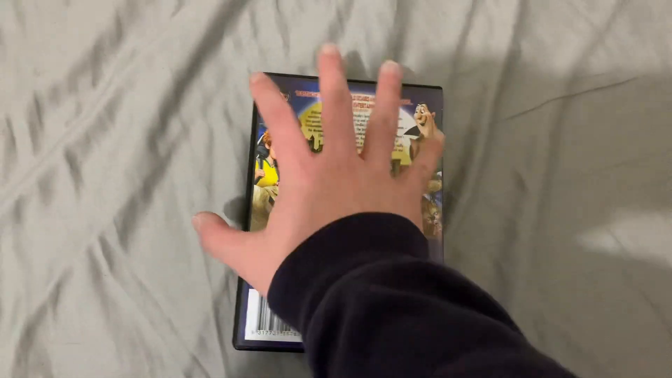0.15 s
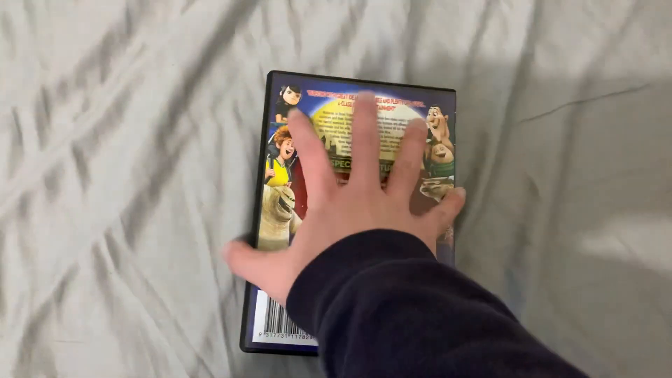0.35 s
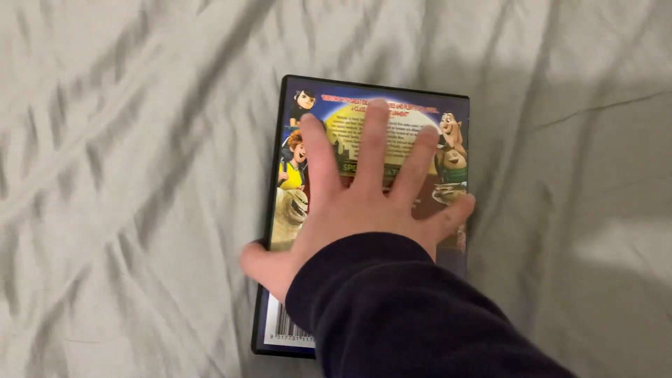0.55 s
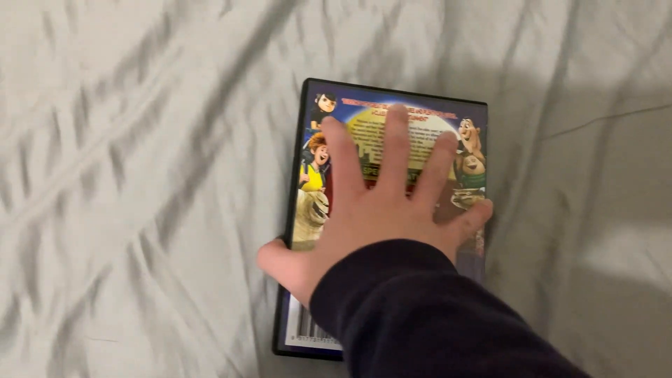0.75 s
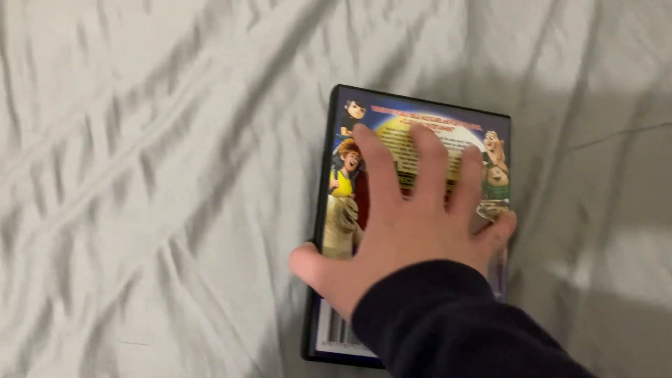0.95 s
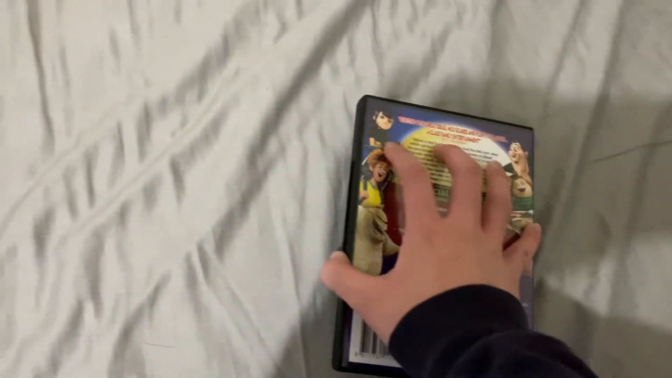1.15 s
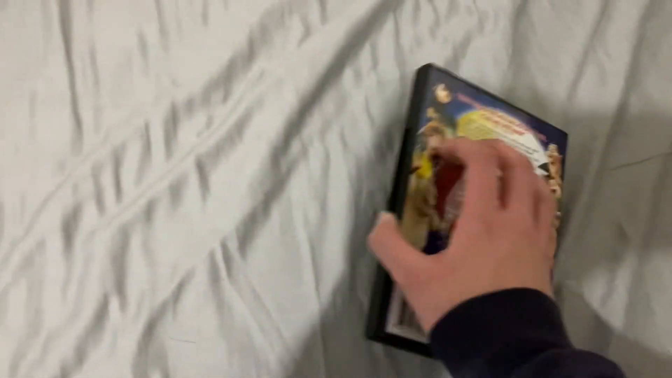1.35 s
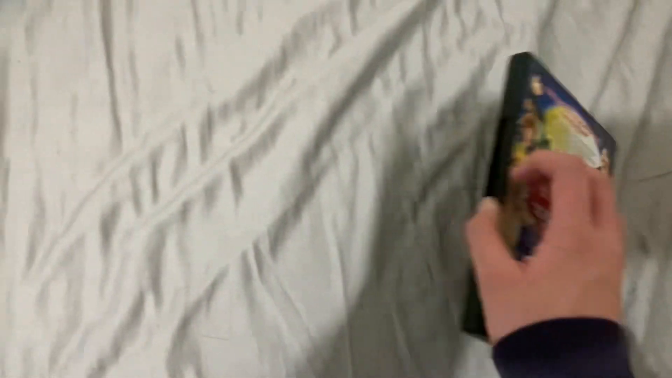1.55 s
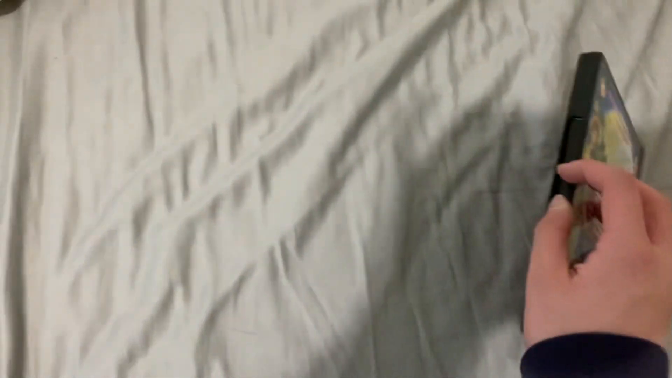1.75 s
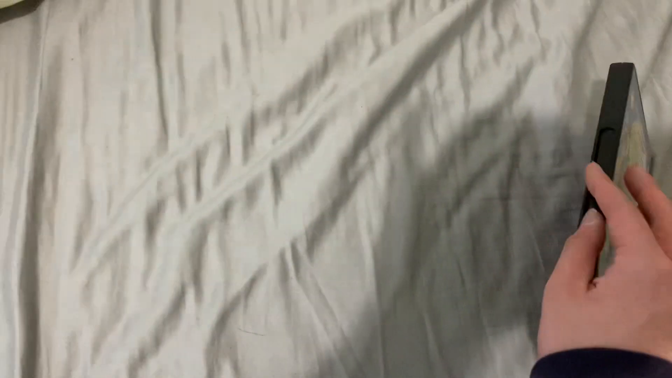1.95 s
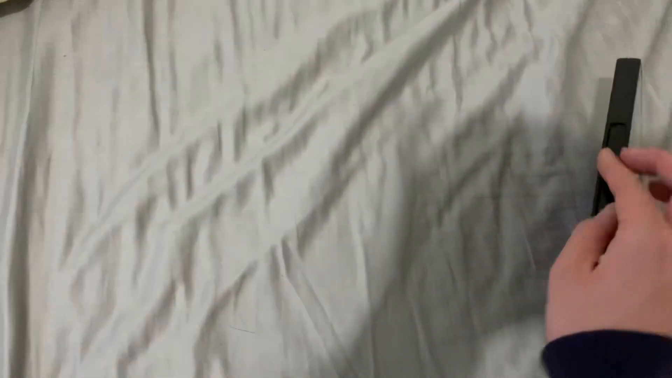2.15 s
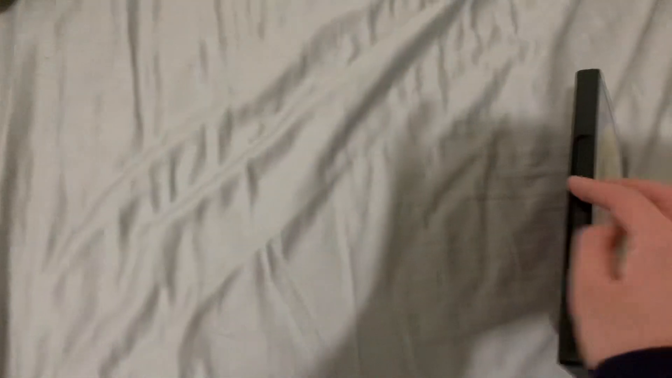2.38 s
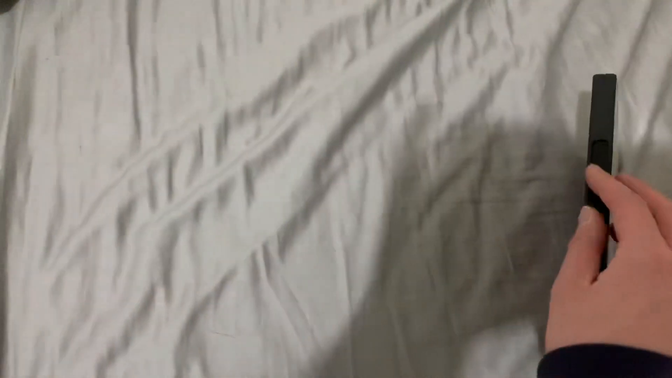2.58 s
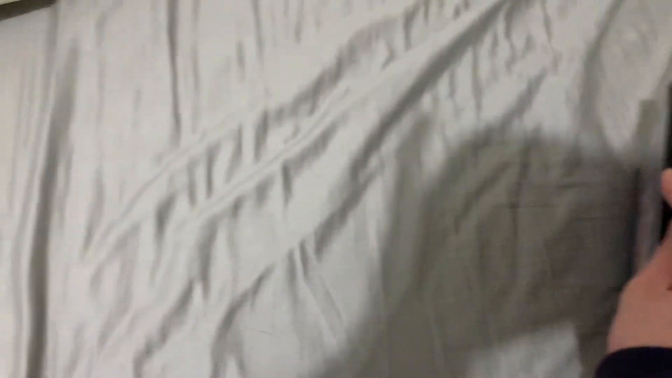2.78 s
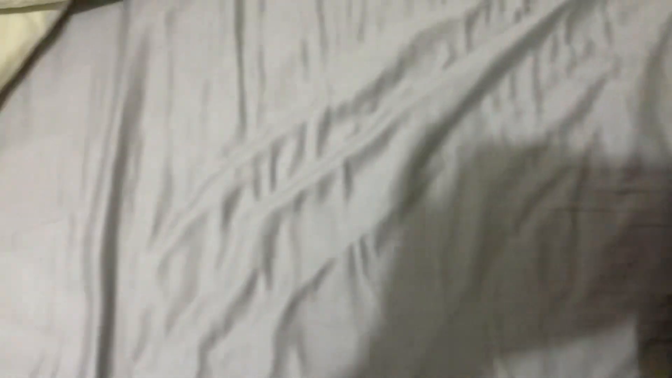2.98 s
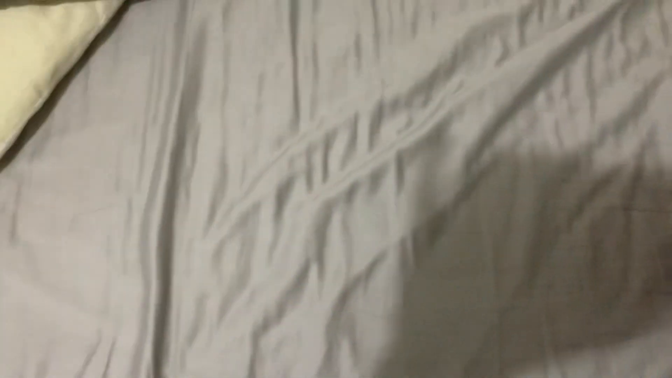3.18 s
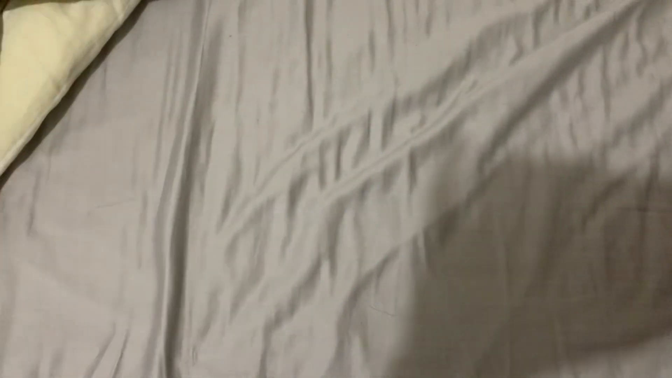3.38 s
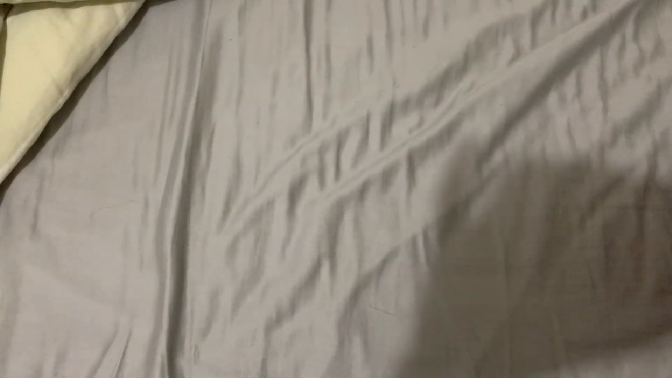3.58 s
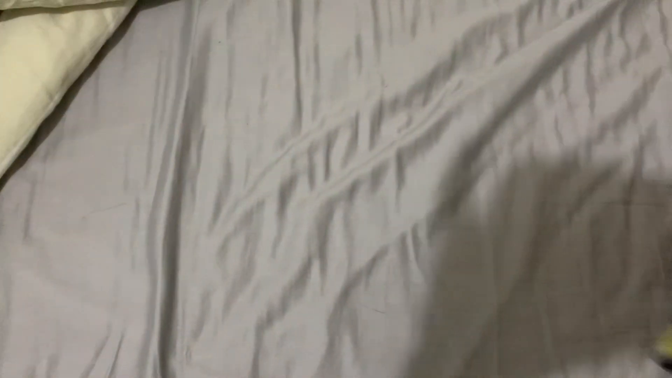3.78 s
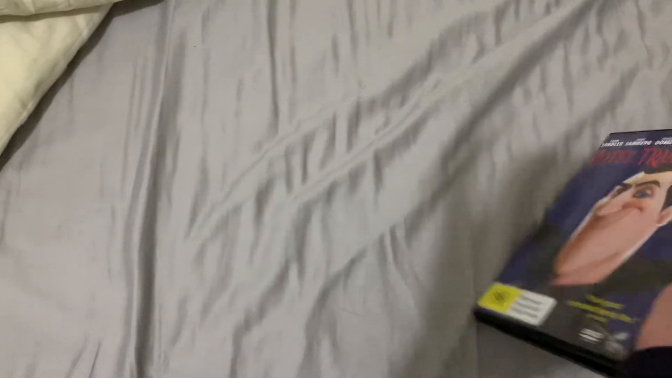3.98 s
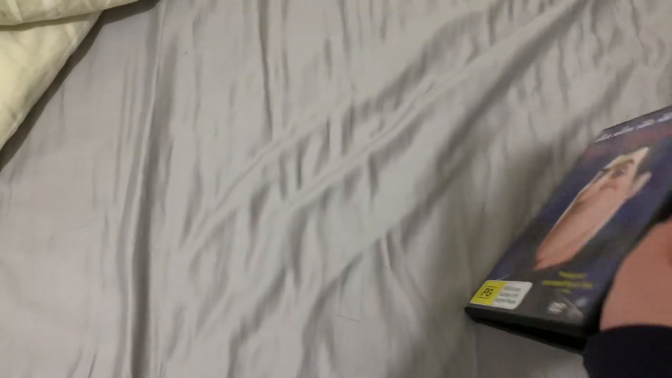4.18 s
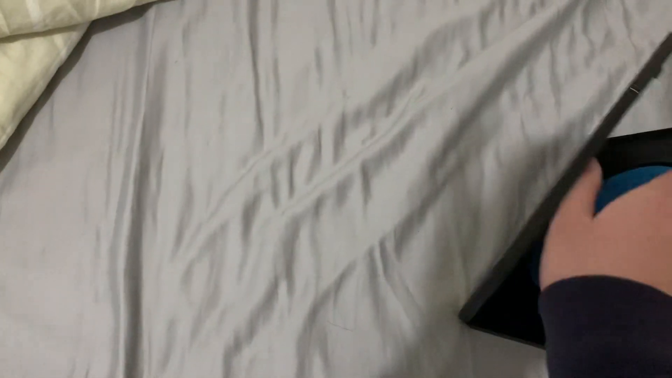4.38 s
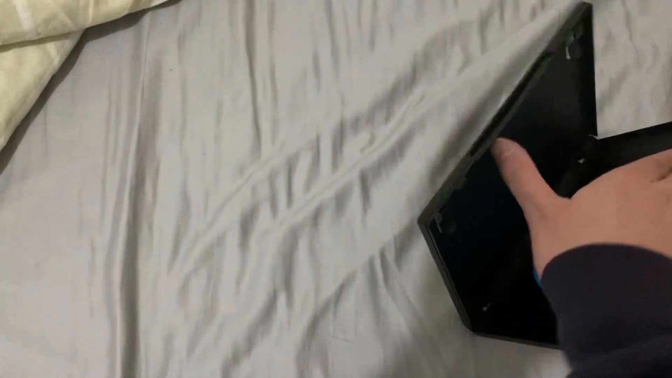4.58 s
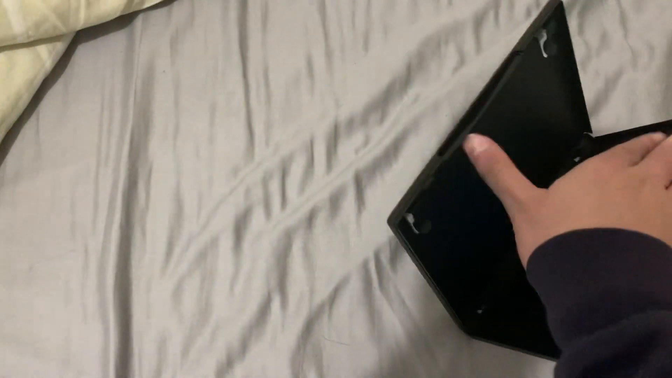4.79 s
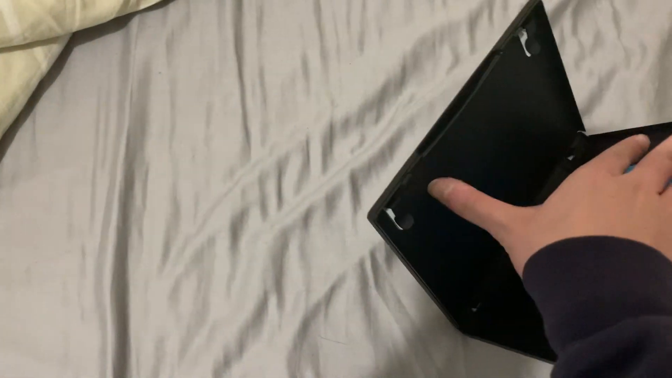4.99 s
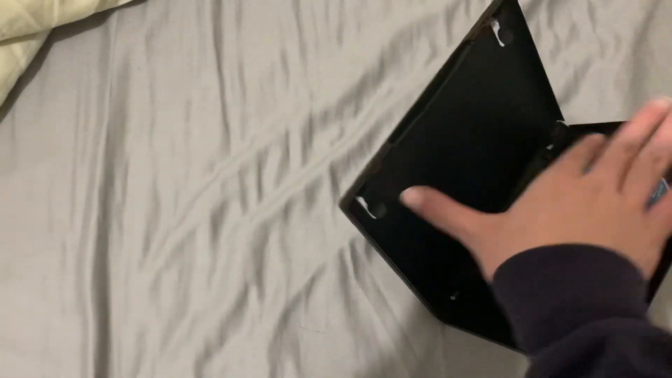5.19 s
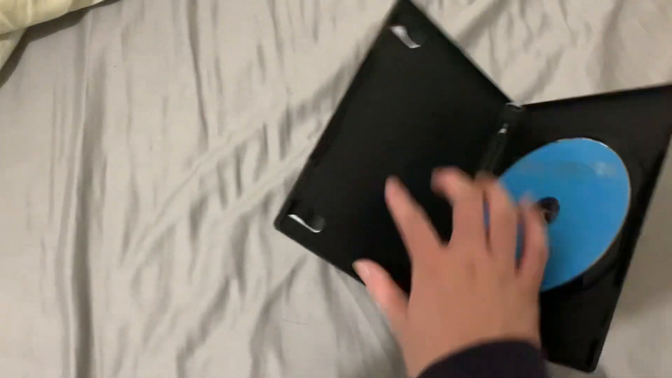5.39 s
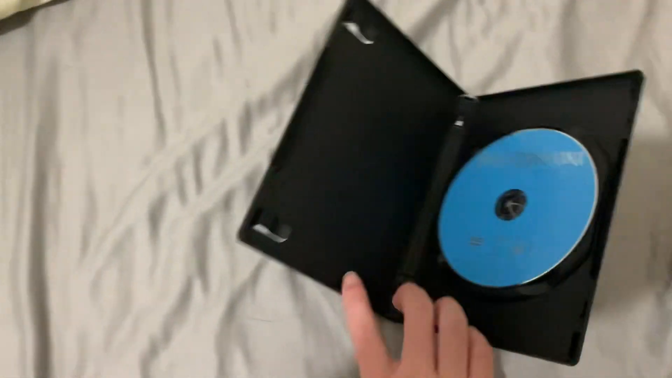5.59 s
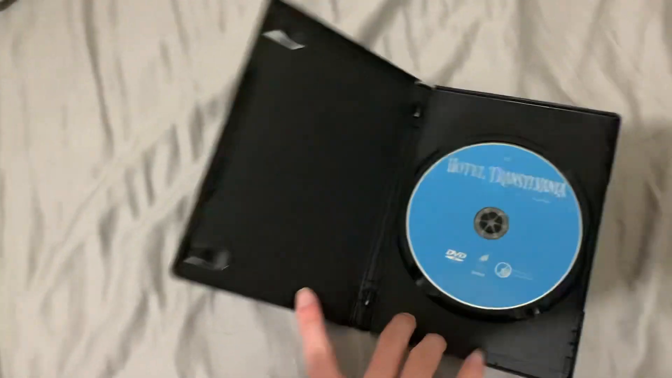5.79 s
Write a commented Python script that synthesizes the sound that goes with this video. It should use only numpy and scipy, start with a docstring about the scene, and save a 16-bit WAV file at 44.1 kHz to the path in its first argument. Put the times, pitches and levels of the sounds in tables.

```python
"""Over a low steady hum in a small quiet bedroom, fingers first touch a plastic disc case on a bed sheet.
The hand turns it over: sheet threads brush it as noise, and soft bumps are low tones that quickly sink.
Nails pick at its edge: short noise bursts ring the plastic's resonances. After a faint squeak it snaps open
in short tones that swell in loudness and a bright crack, and the halves chatter. The spine creaks; fingers
scrape (tiny random jerks), squeak and tap on lid and tray, with one thumb stroke. The room answers softly."""
import sys
import numpy as np
from scipy import signal
from scipy.fft import rfft, irfft, next_fast_len
from scipy.io import wavfile
from scipy.ndimage import map_coordinates

SR = 44100
rng = np.random.default_rng(int(sys.argv[2]) if len(sys.argv) > 2 else 0)


def bounce(signal):
    """Save signal as a 16-bit WAV file at the path given by the first command-line argument."""
    frames = np.transpose(np.atleast_2d(signal))
    limited = np.clip(frames, -1, 1)
    pcm = np.round(limited * 32767).astype(np.int16)
    wavfile.write(sys.argv[1], SR, pcm)


N = 257544


def amp(db):
    """Turn decibels into a gain."""
    return 10 ** (np.asarray(db) / 20)


def unit(x):
    """Scale a sound to an rms (average strength) of 1."""
    return x / np.sqrt(np.mean(x ** 2) + 1e-20)


def along(points, hz):
    """Read a curve of (frequency, value) points on a logarithmic frequency axis."""
    f, value = np.transpose(points)
    return np.interp(np.log(hz + 1), np.log(f + 1), value)


def wobble(rate):
    """A smooth random curve with rate random points a second."""
    knots = rng.standard_normal(int(N * rate / SR) + 4)
    return map_coordinates(knots, [np.arange(N) * rate / SR])


def filtered(x, response):
    """Multiply the spectrum of x by a response that depends on frequency."""
    n = x.shape[-1]
    padded = next_fast_len(n + SR // 10)
    hz = np.fft.rfftfreq(padded, 1 / SR)
    return irfft(rfft(x, padded) * response(hz), padded)[..., :n]


def coloured(x, spectrum):
    """Give x a colour drawn as (frequency [Hz], level [dB]) points."""
    return filtered(x, lambda hz: amp(along(spectrum, hz)))


def ring(x, modes):
    """Send x through resonances (frequency [Hz], width [Hz], level [dB]) of alternating sign."""
    def response(f):
        total = 0
        for k, (centre, width, db) in enumerate(modes):
            resonance = 1j * f * width / (centre * centre - f * f + 1j * f * width)
            total = total + (-1) ** k * amp(db) * resonance
        return total
    return filtered(x, response)


def pair(x, likeness):
    """Mix two unrelated signals into a left and right that are partly alike."""
    def shares(hz):
        turn = np.arccos(np.clip(along(likeness, hz), -1, 1)) / 2
        return np.array([np.cos(turn), np.sin(turn)])
    mid, side = filtered(x, shares)
    return np.array([mid + side, mid - side])


def noise(n, likeness):
    """White noise in stereo, n samples long."""
    return pair(rng.standard_normal((2, n)), likeness)


def panned(x, db):
    """Make left louder than right by db."""
    return x * amp([[db / 2], [-db / 2]])


def add(track, s, x):
    """Mix x into the track at time s, cutting off what runs past the end."""
    part = track[:, round(s * SR):][:, :x.shape[-1]]
    part += x[..., :part.shape[1]]


# How alike left and right are in sound from all around: (frequency [Hz], likeness [0 to 1])
DIFFUSE = [(300, 0.908), (700, 0)]
# Colour of the room noise: (frequency [Hz], level [dB])
AIR = [(15, -36), (25, -13.5), (90, 0), (301, -7.5), (335, -11.5), (430, -8), (600, -12.5), (2020, -20.5),
       (2630, -24.5), (2930, -29.5), (3830, -29.5), (5600, -37), (13800, -42), (15000, -93.5)]
# Narrow bands of a distant fan: (centre [Hz], width [Hz], relative level [dB])
HUM = [(98.4, 32, -16), (365, 11, -2), (401.5, 10, 4.5), (2565, 110, -14)]
# The room noise eases a little towards the end.
FLOOR_DB, EASE_DB_PER_S, EASE_FROM_S = -57, 1, 3.9


def background():
    """Low room noise and a distant fan's fuzzy hum: shaped noise and noise in narrow bands."""
    hum = unit(ring(noise(N, DIFFUSE), HUM))
    air = unit(coloured(noise(N, DIFFUSE), AIR))
    floor_db = FLOOR_DB - EASE_DB_PER_S * np.maximum(np.arange(N) / SR - EASE_FROM_S, 0)
    return amp(floor_db) * (air + amp(-7.0) * hum)


# How long the echo takes to fall by 60 dB: (frequency [Hz], decay time [s])
ROOM = [(100, 0.7), (800, 0.52), (8000, 0.35), (15000, 0.39)]


def room(x):
    """The small room's answer: a fading noise tail in which the highs mostly die before the lows."""
    hz, t, grains = signal.stft(noise(SR // 2, DIFFUSE), SR, nperseg=256)
    fade = amp(-60 * t / along(ROOM, hz)[:, None])
    tail = signal.istft(grains * fade, SR, nperseg=256)[1]
    # the answer starts 8 ms late
    tail = np.pad(tail, ((0, 0), (round(.008 * SR), 0))) / np.linalg.norm(tail[0])
    mono = x.mean(axis=0)[None]
    return signal.fftconvolve(mono, tail, axes=1)[:, :N]


# The case's place, heard as a delay between the two ports: (time [s], left lags by [ms])
PLACE = [(1.6, 0.0089), (2.7, 0.11), (3.6, 0.17), (4.7, 0.023)]


def ports(x):
    """Two microphone ports: sound from the right reaches the left port a little later."""
    n = np.arange(N)
    lag = np.interp(n / SR, *np.transpose(PLACE)) * SR / 1000  # in samples
    return np.array([map_coordinates(x[0], [n - lag], order=5), x[1]])


# Dull bumps of the case on the mattress, loudest as it springs open: (time [s], level [dB])
BUMPS = [(1.065, -35), (1.534, -47), (2.473, -53), (3.557, -25.5), (4.061, -45.5), (4.612, -44.5),
         (4.642, -47)]


def bumps():
    """A soft low thud that starts higher and quickly sinks in pitch."""
    out, t = np.zeros((2, N)), np.arange(SR // 8) / SR
    hz = 68 + 220 * np.exp(-t / 0.0081)
    tone = np.sin(2 * np.pi * np.cumsum(hz) / SR)
    swell = t / 0.0097 * np.exp(1 - t / 0.0095) * np.exp(-(t / 0.028) ** 4)
    for s, db in BUMPS:
        add(out, s, amp(db) * swell * tone)
    return out


# How alike left and right are in sound from close by: (frequency [Hz], likeness [0 to 1])
DIRECT = [(500, 0.95), (2000, 0.85), (6000, 0.2)]


def slips(n, rate, spread_db):
    """Tiny jerks at random moments and of uneven size, about rate a second."""
    jerks = (rng.random(n) < rate / SR) * amp(spread_db * rng.standard_normal(n))
    return pair(jerks * rng.standard_normal((2, n)), DIRECT)


def panel(x, t60, ring_db):
    """Thin panels add a dense cluster of short modes: a fading noise tail, new at every call."""
    t = np.arange(SR // 16) / SR
    tail = noise(len(t), DIRECT) * amp(-60 * t / t60)
    response = amp(ring_db) * tail / np.linalg.norm(tail[0])
    response = response + (t == 0)  # the sound itself, ahead of the tail
    return signal.fftconvolve(x, response / np.linalg.norm(response[0]), axes=1)[:, :x.shape[1]]


def regripped(x, every):
    """The panels' colour drifts as the hand moves to a new grip every so many seconds."""
    t = np.arange(N) / SR
    out = np.zeros((2, N))
    for s in np.arange(0, N / SR, every):
        a, b = np.searchsorted(t, [s - every, s + every])
        hold = np.cos(np.pi / 2 * (t[a:b] - s) / every)  # neighbouring grips cross-fade
        add(out, a / SR, panel(x[:, a:b] * hold, t60=.035, ring_db=3))
    return out


SWELL_STEEPNESS = 2.74  # near half strength at the ends of a row's length


def swells(rows):
    """Strength over time: each row swells and fades evenly around its strongest moment."""
    t = np.arange(N) / SR
    power = 0
    for s, length, db in rows:
        fall = np.exp(-SWELL_STEEPNESS * np.abs((t - s) / length))
        power = power + (amp(db) * 2 * fall / (1 + fall ** 2)) ** 2
    return np.sqrt(power)


# The case and a sleeve sliding over the sheet: (fastest moment [s], length [s], level [dB])
SLIDES = [(1.51, 0.32, -64.5), (1.88, 0.12, -65), (2.24, 0.078, -63), (3.98, 0.072, -54), (4.22, 0.13, -60),
          (4.38, 0.06, -49.5), (4.585, 0.065, -49.5), (4.69, 0.43, -60.5), (5.192, 0.022, -35.5),
          (5.27, 0.13, -53), (5.455, 0.1, -39.5), (5.52, 0.015, -44)]
# Colour of the sheet's threads: (frequency [Hz], level [dB])
CLOTH = [(400, -21), (1100, 5.5), (2500, 1.5), (5000, -0.5), (7400, -2.5), (8400, 4), (10500, -2),
         (14000, -8), (15200, -32)]
# A dull low rub under the handling, and the short dull knock of a tap:
# (strongest moment [s], length [s], level [dB])
DULL_SOUNDS = [(1.57, 0.73, -67), (1.603, 0.023, -48.5)]
# Colour of those dull sounds: (frequency [Hz], level [dB])
DULL = [(200, -11), (700, 4), (1100, 4.5), (2000, -20.5), (6000, -15), (14000, -58)]


def slide():
    """Threads of the sheet brush the case in a fine, uneven swish, over a dull rub and a short knock."""
    threads = slips(N, rate=6000, spread_db=2) * amp(2 * wobble(90))
    swish = panned(swells(SLIDES) * unit(coloured(threads, CLOTH)), -1.6)
    dull = swells(DULL_SOUNDS) * unit(coloured(threads, DULL))
    return swish + dull


# Light pats on the clear cover film: (time [s], level [dB])
PATS = [(0.538, -71), (1.125, -74)]
# Resonances of the film: (frequency [Hz], width [Hz], level [dB])
FILM = [(2100, 800, -11), (3780, 190, -4)]
FILM_CONTACT_S = 0.0013  # the touch is firmest this long after it starts


def pats():
    """A fingertip lands lightly on the clear cover film, which answers with one short high note."""
    out, t = np.zeros((2, N)), np.arange(SR // 16) / SR
    for s, db in PATS:
        touch = noise(len(t), DIRECT) * t * np.exp(-t / FILM_CONTACT_S)
        add(out, s, amp(db) * unit(ring(touch, FILM)))
    return out


RUB_ATTACK_S, RUB_RELEASE_S, RUB_SAG_DB_PER_S = 0.011, 0.012, 15  # a finger grips, lifts, slowly eases


def stroke(t, length):
    """Pressure of one stroke: it rises, holds with a slight sag and dies away."""
    grip = np.sin(np.pi / 2 * np.minimum(t / RUB_ATTACK_S, 1)) ** 2
    lift = np.exp(-np.maximum(t - length, 0) / RUB_RELEASE_S)
    return amp(-RUB_SAG_DB_PER_S * t) * grip * lift


# The spine creaking as the lid opens: (start [s], length [s], level [dB])
CREAKS = [(3.886, 0.16, -57.5), (4.247, 0.051, -56), (4.345, 0.046, -54), (4.452, 0.052, -53),
          (5.346, 0.045, -50), (5.787, 0.04, -57)]
# Resonances of the spine: (frequency [Hz], width [Hz], level [dB])
SPINE = [(1090, 40, 7.5), (1565, 150, 1), (1780, 186, 1), (2870, 480, -8.5), (4120, 1100, -13.5)]


def creaks():
    """The spine gives in coarse little slips each time the lid is pushed further open."""
    out, t = np.zeros((2, N)), np.arange(SR // 3) / SR
    for s, length, db in CREAKS:
        drive = slips(len(t), rate=1300, spread_db=2)
        add(out, s, amp(db) * stroke(t, length) * unit(ring(drive, SPINE)))
    return out


# The thumb's one stroke up the inside of the lid: (start [s], length [s], level [dB])
SKATE = (4.838, 0.092, -46)
# Resonances at the top of the arch: (frequency [Hz], width [Hz], level [dB])
SKATE_MODES = [(1036, 100, 0), (1740, 330, -2), (2870, 260, -2), (3420, 190, -5), (4850, 160, -6),
               (5460, 150, -3), (7050, 290, -9.5), (10300, 1300, -14)]
ARCH_TOP_S, ARCH_DEPTH = .07, .09  # they peak this long into the stroke, from this share lower


def thumb():
    """The thumb skates up the inside of the lid: its resonances rise and sink again in one arch."""
    out, t = np.zeros((2, N)), np.arange(SR // 5) / SR
    s, length, db = SKATE
    tuning = 1 - ARCH_DEPTH * np.sin(np.pi / 2 * (t / ARCH_TOP_S - 1)) ** 2
    steady = unit(ring(noise(len(t), DIRECT), SKATE_MODES))
    # reading the noise slower lowers its pitch
    moving = np.array([map_coordinates(port, [np.cumsum(tuning)], order=5) for port in steady])
    add(out, s, amp(db) * stroke(t, length) * moving)
    return out


# Brief squeaks, a faint one just before the snap, the others during the handling:
# (middle [s], level [dB], pitch [Hz], half length [s])
SQUEAKS = [(3.546, -48, 2300, .008), (4.749, -33, 3300, .006), (5.49, -34.5, 2060, .012),
           (5.694, -44, 3400, .005), (5.691, -50, 2800, .008)]


def squeaks():
    """Brief squeaks: each is a short tone made rough by a randomly wavering phase."""
    t = np.arange(N) / SR
    waver = 1.1 * wobble(330)  # phase in radians
    out = 0
    for s, db, hz, half in SQUEAKS:
        swell = np.exp(-((t - s) / half) ** 2)
        out = out + amp(db) * swell * np.sin(2 * np.pi * hz * t + waver)
    return out


# Skin dragging on plastic: (start [s], length [s], level before a trim [dB],
# pitch ratio of the lid's resonances under that grip)
RUBS = [(2.189, 0.2, -57.5, 1.09), (2.48, 0.04, -57, 0.875), (2.639, 0.11, -61, 1.14),
        (4.35, 0.046, -60.5, 1.14), (4.544, 0.059, -52, 0.95), (4.731, 0.027, -39.5, 0.94),
        (4.923, 0.056, -57, 0.97), (5.173, 0.036, -41, 1.04), (5.205, 0.037, -43.5, 1.07),
        (5.304, 0.096, -53, 1.12), (5.395, 0.052, -42, 0.84), (5.43, 0.061, -42.5, 1.25),
        (5.674, 0.023, -52.5, 1.2), (5.714, 0.03, -53.5, 1.1)]
# Colour of skin on plastic, also used for the snap's crack: (frequency [Hz], level [dB])
SKIN = [(300, -20.5), (750, 9.5), (3800, 10), (7400, 0.5), (8500, 4), (14200, -7), (15200, -29.5)]
# Resonances of the broad lid and tray, also used by the taps: (frequency [Hz], width [Hz], level [dB])
LID = [(760, 340, -8.5), (1076, 170, 8), (1567, 190, 1), (2040, 460, 4.5), (2800, 770, -4.5),
       (3290, 250, 0), (5470, 120, -14.5)]
BUNCH_DB, BUNCHES_PER_S = 2.4, 260  # the slips bunch up as the skin catches and lets go


def scrape():
    """Skin sticks and slips in tiny uneven jerks that drive the plastic; pressing harder adds hiss."""
    out, t = np.zeros((2, N)), np.arange(SR // 3) / SR
    for s, length, db, tuning in RUBS:
        pressure = amp(db) * stroke(t, length)
        drive = slips(len(t), rate=2200, spread_db=3)
        drive = drive * amp(BUNCH_DB * wobble(BUNCHES_PER_S)[:len(t)])
        hiss = amp(5.5) * (pressure / amp(-35.5)) ** 0.53 * unit(coloured(drive, SKIN))
        modes = [(hz * tuning, width, mode_db) for hz, width, mode_db in LID]
        body = unit(ring(drive, modes))
        add(out, s, amp(-1.0) * pressure * (body + hiss))
    return out


# Short contacts on the case, from fingers, nails and one knock just after the snap: (time [s],
# shell level before a trim [dB], sharp tick over shell before a trim [dB], left over right [dB])
TAPS = [(0.372, -60.5, 7, 2), (1.308, -55, 0, -14), (1.594, -38.5, 10, -3), (1.611, -42, -4, -5),
        (2.21, -26, -13, -2.5), (2.279, -41, -10, -4), (2.315, -36, -18, -4), (2.344, -36, -7, -3),
        (2.502, -38.5, -30, 1), (2.642, -27.5, -9.5, -0.5), (2.682, -34, -17, -3), (2.756, -36, -13, 0),
        (2.776, -57, 12, -7), (2.791, -42.5, 10.5, -1.5), (3.564, -26, -1, -10), (3.825, -40.5, -26, 3),
        (3.865, -35, -14, -0.5), (3.907, -37, -9.5, -3), (4.4, -41.5, -4, 11), (4.734, -27.5, -11, -8.5),
        (4.746, -22.5, -25, -2), (4.76, -31, -17, -7), (4.771, -27, -23, -3), (5.168, -28, -18, 0),
        (5.186, -25.5, -13, 6), (5.194, -25, -6, -1), (5.212, -27, -23, 2), (5.243, -32, -4, -4),
        (5.298, -29, 1.5, -3), (5.373, -27, 2.5, -5.5), (5.564, -36, -17, 3), (5.61, -34, -4.5, 1),
        (5.658, -35, -6.5, 1), (5.71, -26, -9.5, 2), (5.72, -27.5, -8, 1), (5.736, -34.5, -14, 3)]
# Resonances of the shut case's stiff rim: (frequency [Hz], width [Hz], level [dB])
RIM = [(670, 240, -7.5), (1030, 68, -2.5), (1682, 87, 6.5), (2060, 200, -5.5), (2460, 36, -5),
       (3150, 85, -2), (3790, 120, -2), (4480, 290, -10), (6340, 310, -10)]
# While the nails pick at the rim: (start [s], end [s])
RIM_S = (2, 3)
# Colour of the sharp tick: (frequency [Hz], level [dB])
TICK = [(1500, -4), (4500, -0.5), (6500, 11.5), (8200, 6.5), (10500, 6.5), (16000, -22)]
CONTACT_S, TICK_S = 0.0017, 0.00062  # how long the soft and the sharp part take to land
SETTLE_S, SETTLE_DB = .013, -14.5  # the shell settles a moment later, more softly


def taps():
    """Each contact is a brief scuff: it rings the shell at new strengths, ticks sharply and settles."""
    out, t = np.zeros((2, N)), np.arange(SR // 8) / SR
    u, late = t / CONTACT_S, np.maximum(t - SETTLE_S, 0) / CONTACT_S
    force = u * np.exp(-u) + amp(SETTLE_DB) * late * np.exp(-late)
    for s, db, tick_db, pan_db in TAPS:
        plastic = RIM if RIM_S[0] < s < RIM_S[1] else LID
        modes = [(hz, width, mode_db + rng.normal(0, 1.86)) for hz, width, mode_db in plastic]
        shell = unit(ring(noise(len(t), DIRECT) * force, modes))
        sharp = coloured(noise(len(t), DIRECT), TICK) * t * np.exp(-t / TICK_S)
        tick = unit(panel(sharp, t60=0.031, ring_db=-2))
        contact = amp(db - 25.5) * shell + amp(db + tick_db - 27.0) * tick
        add(out, s, panned(contact, pan_db))
    return out


# Colour of the chattering halves: (frequency [Hz], level [dB])
RATTLE = [(25, -39), (55, -3), (100, 10), (215, 7.5), (350, -2), (800, 5), (1400, 0), (1700, 6), (2400, -3),
          (3500, -3), (5000, -7.5), (10000, -7), (16000, -22.5)]
SNAP_S = 3.5562  # the catch lets go


def shudder():
    """The freed halves chatter against each other after the snap: dense, uneven little contacts."""
    out, t = np.zeros((2, N)), np.arange(SR // 2) / SR
    contacts = (rng.random(len(t)) < 5000 / SR) * rng.standard_normal((2, len(t)))
    chatter = pair(contacts, DIFFUSE) * amp(1.8 * wobble(250)[:len(t)])
    rattle = unit(panel(coloured(chatter, RATTLE), t60=0.04, ring_db=-6.0))
    rattle = rattle * (1 - np.exp(-t / 0.0046))  # soft start
    add(out, SNAP_S + .002, panned(rattle * amp(-17.5 - 60 * t / 0.14), -0.88))
    return out


# The shell flexing: (frequency [Hz], level [dB], time to fall 60 dB [s], left over right [dB])
FLEX = [(793, -16.5, 0.0075, -12.5), (1733, -3, 0.0052, -7), (2000, -13, 0.013, 2.5)]
# The catch's own bright ring: (frequency [Hz])
CATCH_HZ = [3100, 3950, 4650, 7990]
CATCH_WIDTH_HZ, CATCH_RING_DB = 140, 7


def snap():
    """The shell flexes ever harder as the catch rides over its lip, then lets go: (flex, crack)."""
    flex, crack, t = np.zeros((2, N)), np.zeros((2, N)), np.arange(SR // 10) / SR
    ride = .003  # seconds on the lip
    before, after = np.maximum(ride - t, 0), np.maximum(t - ride, 0)
    build = amp(-8 * before / ride) * (1 - np.exp(-t / 0.0002))
    for hz, db, t60, pan_db in FLEX:
        tone = build * amp(db - 60 * after / t60) * np.sin(2 * np.pi * hz * t)
        add(flex, SNAP_S - ride, panned(tone, pan_db))
    burst = unit(coloured(noise(len(t), DIRECT), SKIN)) * amp(-16 - 60 * after / 0.011) * build ** 2
    burst = panned(burst, -4.5)
    add(crack, SNAP_S - ride, burst)
    catch = [(hz, CATCH_WIDTH_HZ, CATCH_RING_DB) for hz in CATCH_HZ]
    add(flex, SNAP_S - ride, ring(burst, catch))
    return flex, crack


def scene():
    """The case close by, the room around it; little of the shell's flexing reaches the walls."""
    rubbing = regripped(scrape() + slide(), every=1 / 10)
    handling = taps() + pats() + rubbing + creaks() + thumb() + squeaks()
    flex, crack = snap()
    halves = shudder()
    echo = room(amp(-11.5) * handling + amp(-4.5) * crack + amp(-21.5) * flex + amp(-10.5) * halves)
    return ports(handling + flex + crack) + halves + bumps() + echo + background()


TOP_HZ = 15900  # band limit


def record(dry):
    """The recorder rounds off high peaks, sheds the deepest bass and cuts steeply above its band limit."""
    rounded = dry / (1 + np.abs(dry / .8) ** 4) ** (1 / 4)

    def response(hz):
        low_cut = (1j * hz) ** 2 / ((1j * hz) ** 2 + 1j * hz * 45 + 50 ** 2)
        high_cut = 1 / (1 + (hz / TOP_HZ) ** 200)
        return low_cut * high_cut
    return filtered(rounded, response)


dry = scene()
out = record(dry)
bounce(out)
```